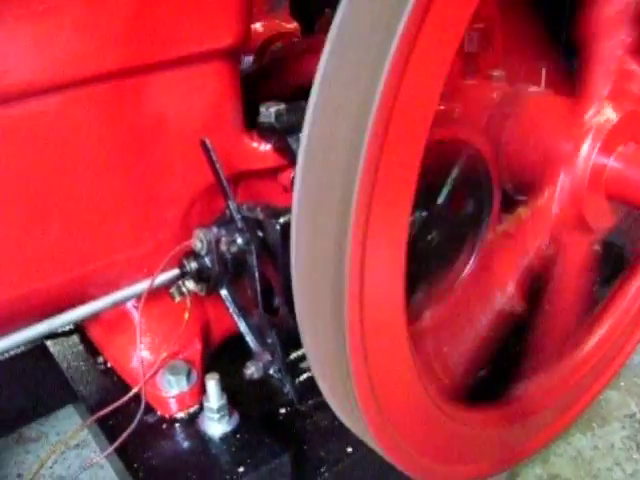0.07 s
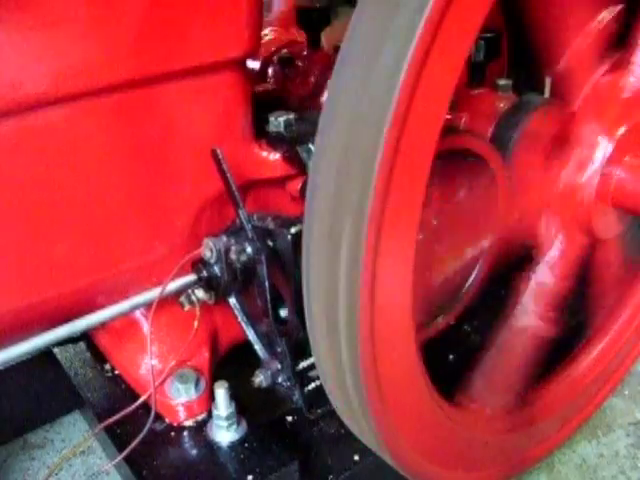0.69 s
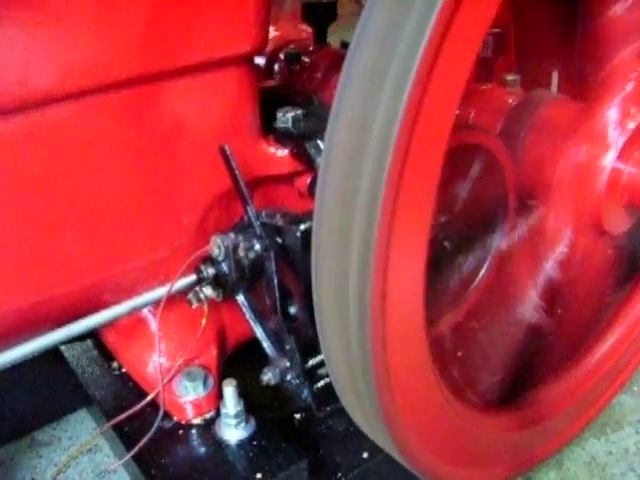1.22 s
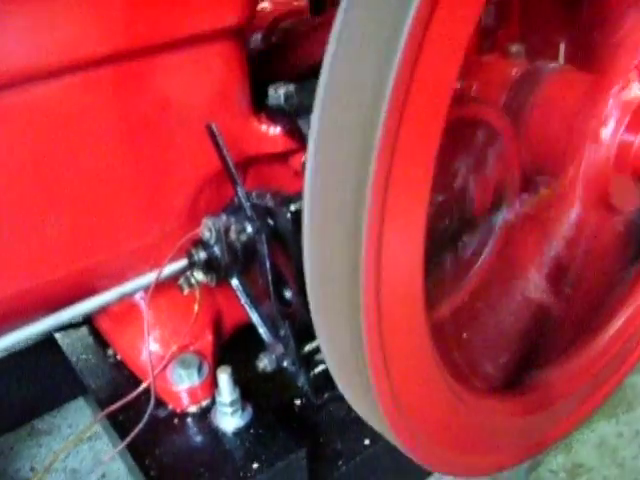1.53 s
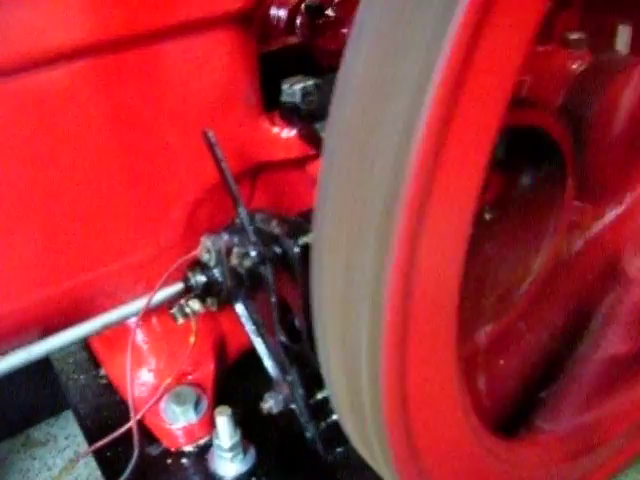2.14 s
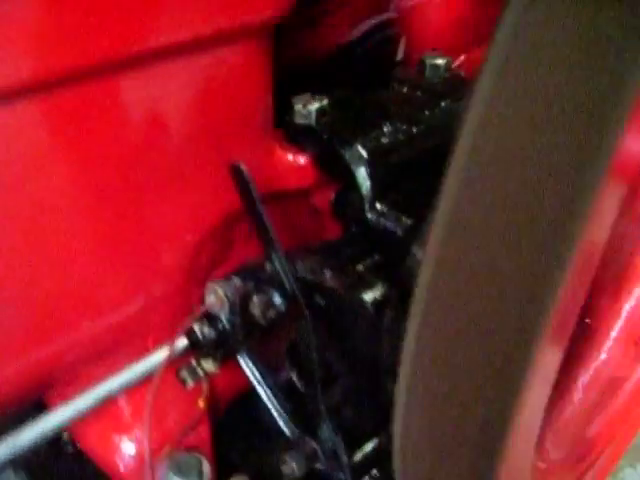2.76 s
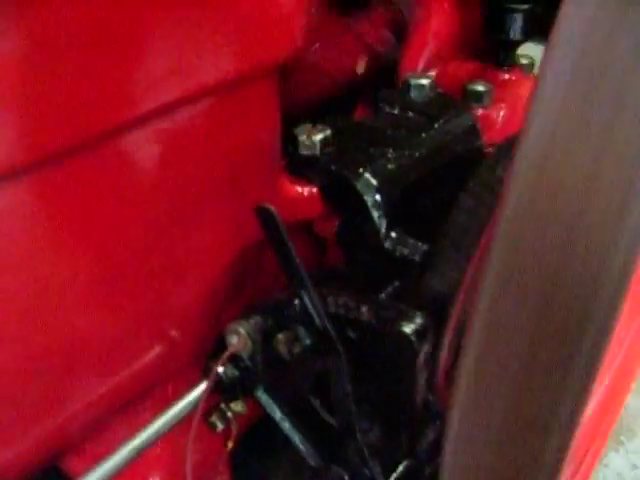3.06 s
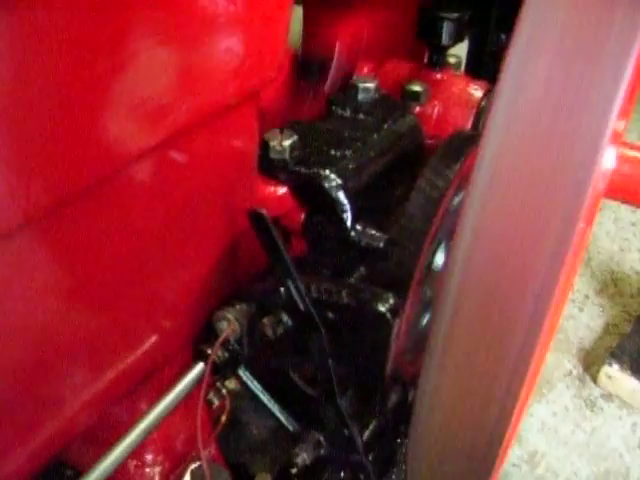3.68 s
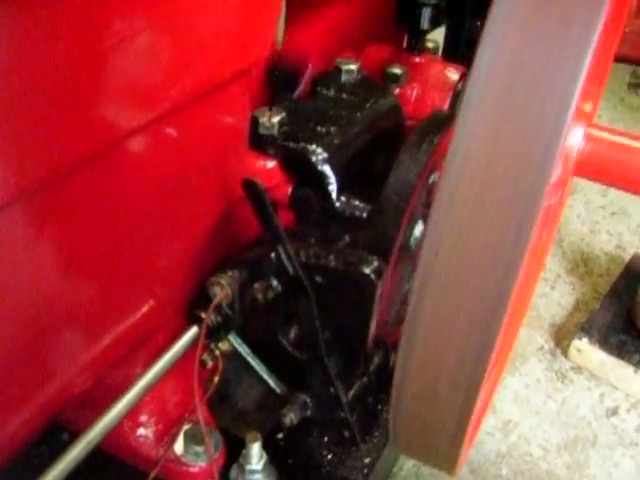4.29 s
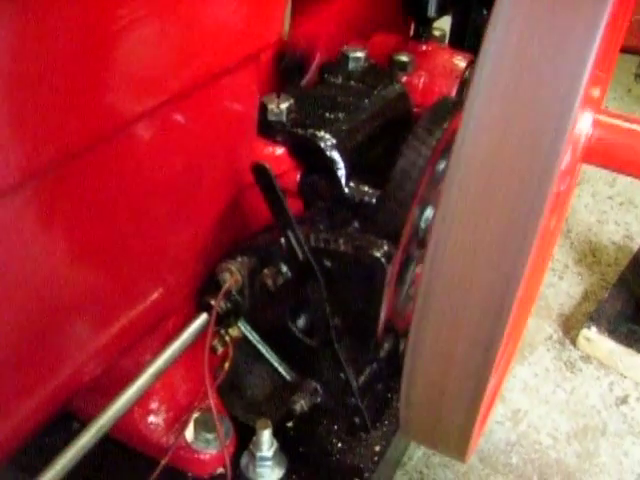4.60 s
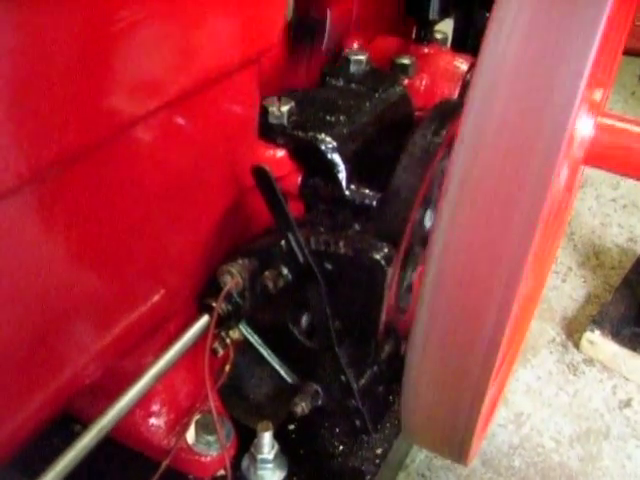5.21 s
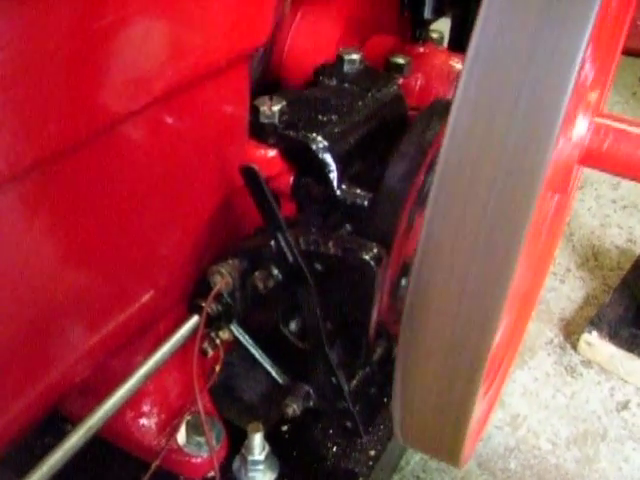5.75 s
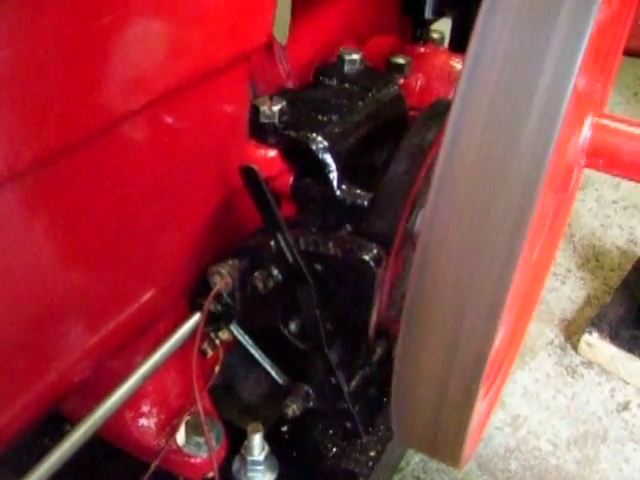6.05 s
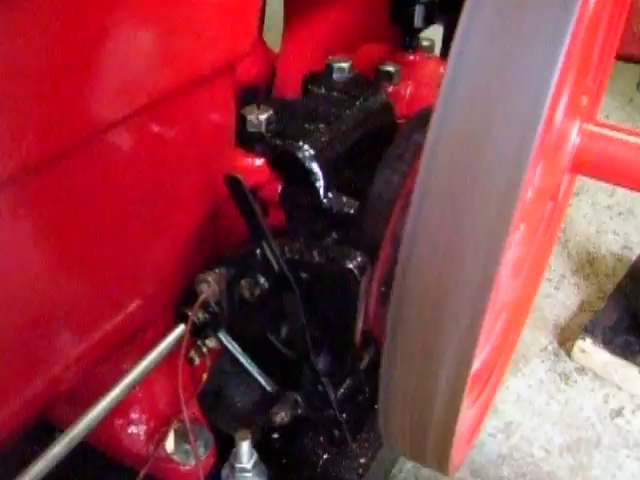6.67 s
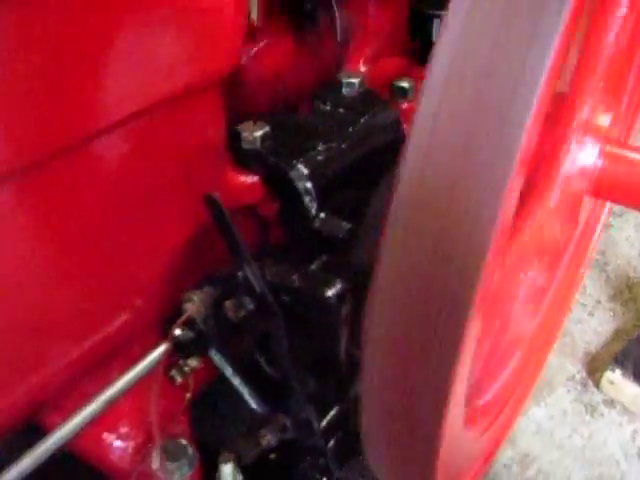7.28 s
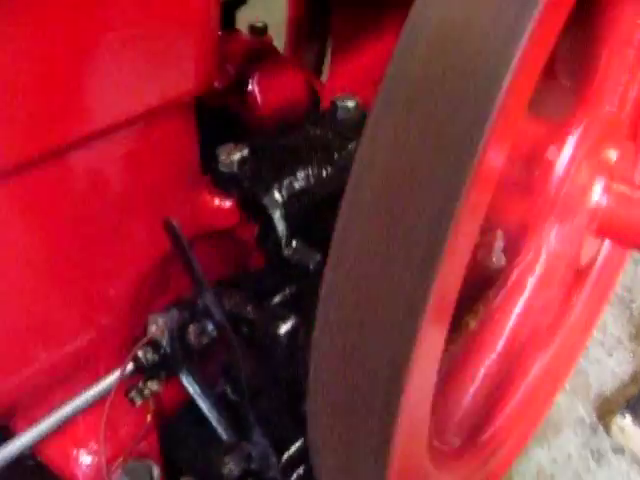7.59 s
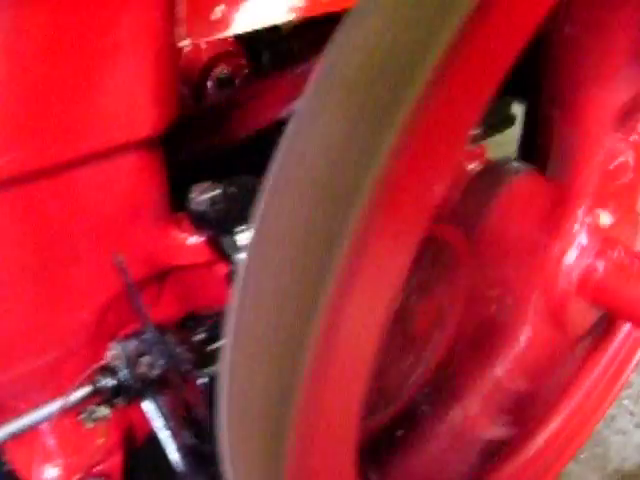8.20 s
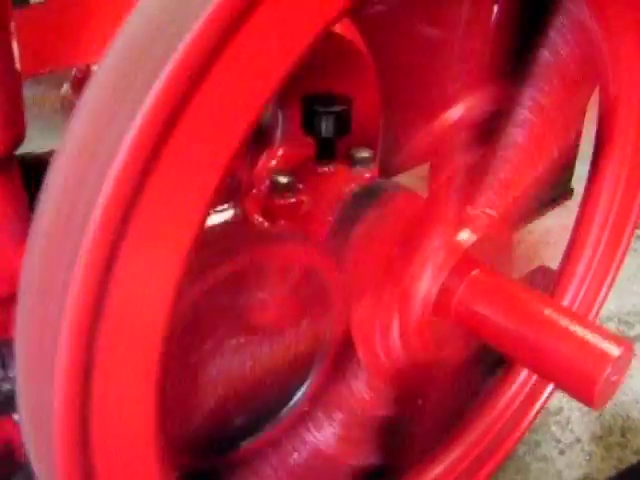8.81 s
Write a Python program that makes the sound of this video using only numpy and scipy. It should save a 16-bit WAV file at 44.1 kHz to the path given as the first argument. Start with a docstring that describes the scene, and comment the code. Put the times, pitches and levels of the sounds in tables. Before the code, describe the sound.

A stationary engine runs throughout, heard close up on a hard floor with a short room echo. Its open gears clatter and hum, with small high chirps of dry steel, while the latch, push rod and loose linkage knock about twice a second, each blow ringing hollowly in the castings. At about 0.6 seconds it snorts in air, the clatter hushes briefly, and at 1.1 seconds it fires with a clank and a short exhaust blast, then speeds up. From about 2 to 6 seconds it coasts, the knocks gradually spreading apart and the gear tones shifting. Around 6.3 seconds comes another thud and snort, a brief hush, and a second firing near 6.9 seconds. The rhythm quickens, lighter at first, with stronger knocks returning from about 8.3 seconds until the end at 9. The sound is narrow, with little treble and slight overload on peaks.

```python
"""On a hard floor, beside the flywheel of a hit-and-miss stationary engine.
Open timing gears clatter, hum and chirp as it coasts down, their wheels singing at critical speeds.
The governor latch, push rod and loose linkage knock on every cam turn and ring the castings.
Twice the engine snorts in a charge, hushes under compression, trips its igniter, fires and speeds up.
It all comes through a small narrow-band recorder that overloads on the peaks."""
import sys
import numpy as np
from scipy import signal
from scipy.fft import rfft, irfft
from scipy.io import wavfile
from scipy.ndimage import uniform_filter1d

SR = 44100
rng = np.random.default_rng(int(sys.argv[2]) if len(sys.argv) > 2 else 0)


def transcribe(u):
    """Save the signal u as a 16-bit wav file named by the first command-line argument.

    u: samples, shape (n,) or (channels, n), limited to [-1, 1]; the rate is SR.
    q: integer samples, one column per channel.
    """
    v = np.clip(np.atleast_2d(u).T, -1, 1)
    q = np.round(v * 32767).astype(np.int16)
    wavfile.write(sys.argv[1], SR, q)


N = 399105
T = np.arange(N) / SR

# The gears leap in speed at each firing, then coast. Each row: time in seconds, tooth rate in Hz.
TOOTH_RATE = [(0, 277.3), (.4, 263.2), (1.08, 231.2), (1.26, 300.6), (1.55, 286.3), (2, 279), (2.5, 263.8),
              (3.3, 239.7), (4.5, 217), (5.5, 190), (6.8, 161), (7, 299.7), (7.6, 284), (8.25, 261.3),
              (9.05, 234)]
# Gear fader, ahead of cam load and compression. Each row: time in seconds, level in dB.
GEAR_LEVEL = [(0, -9.5), (.25, -12), (.45, -15.5), (1.2, -12.5), (1.65, -13), (2.1, -9.5), (2.25, -15),
              (2.6, -13), (3.05, -10.5), (3.55, -14.5), (3.85, -19.5), (4.6, -15.5), (5.17, -10),
              (5.45, -20), (5.85, -11), (6.35, -15), (7.05, -24.5), (7.6, -20), (8.2, -18), (8.68, -12.5),
              (8.92, -21)]
# Hardness of the tooth contact. Each row: time in seconds, treble lift in dB.
TOOTH_HARDNESS = [(0, -3.5), (.95, -4), (1.3, 0.5), (2.2, -2), (3.1, -3), (4, -1), (5.2, -2), (6.2, -4),
                  (6.7, -1.5), (7, -2), (7.8, -1), (8.4, -2.5), (9.05, 3)]
# Load on the teeth around the cam. Each row: share of the turn, level in dB, treble lift in dB.
CAM_LOAD = [(0, -1, 3), (.1, -0.5, 0), (.17, 0.5, -0.5), (.25, -1.5, -3), (.31, 0, 1.5), (0.409, -2, -6),
            (.5, -0.5, 0.5), (.6, 1.5, 2), (0.699, .5, -0.5), (.88, 1, 2.5), (.96, -1, -4)]
# Compression presses the teeth together. Each row: start in seconds, length in seconds, duck in dB.
COMPRESSIONS = [(0.702, 0.296, -13), (6.412, 0.28, -15)]
# Tone of the frame under the teeth. Each row: frequency in Hz, relative level in dB.
FRAME_EQ = [(40, -35), (100, -21.5), (170, -10), (235, -14), (360, -5), (550, 1), (860, -1.5), (1040, 0),
            (1180, -5.5), (1400, -3), (2200, -7), (2600, -16), (3300, -15.5), (4000, -29)]
# Wheel resonances, each singing out near its critical speed. Each row: pitch in Hz, width in Hz,
# level in dB, critical tooth rate in Hz, spread around that rate in Hz, lift there in dB.
WHEEL_MODES = [(282.7, 19.6, -18, 185, 13, 4.5), (763.6, 10, -19, 254, 8, 11), (845, 110, -24, 160, 11, 9),
               (1440, 7.9, -25.5, 236, 8.3, 7.5)]
# How the wheels carry to a listener moving along the engine. Each row: time in seconds, gain in dB.
WHEEL_CARRY = [(0, 1), (1.3, 1.5), (1.9, 3.5), (2.6, 0.5), (3.4, 2), (6, 1), (6.95, -2), (7.9, -0.5),
               (9.05, 2.5)]
# Dry spots that chirp. Each row: share of the cam turn, level in dB against the gear fader.
DRY_SPOTS = [(.012, -8.5), (0.141, -15.5), (.312, -10.5), (.48, -13.5), (0.526, -12), (.59, -13),
             (.65, -15), (.745, -9.5), (.855, -9.5), (0.901, -15.5)]
# Hollow ring of the castings. Each row: pitch in Hz, 60 dB decay in seconds, relative level in dB.
CASTING_MODES = [(388, .11, -5), (432, .09, -4), (500, .11, -1), (535, .09, -2), (635, .07, -2),
                 (765, .12, -4), (838, .1, 0), (1017, .07, -8), (1448, .12, -10), (1700, .07, -12),
                 (1865, .06, -13), (2320, .06, -15)]
# Crack of steel on steel. Each row: frequency in Hz, relative level in dB.
CRACK_EQ = [(50, -54), (200, -19.5), (450, 8.5), (850, 10.5), (1200, 0.5), (2000, -3), (3300, -10.5),
            (4200, -31)]
# Cam turns of two revolutions, each opened by the governor latch. Each row: start in seconds,
# latch level in dB, latch brightness, level of this turn's slack knocks in dB.
CAM_TURNS = [(.424, 1, -9.5, -20), (1.127, 1, -9, -9), (1.609, 4, 3, -13), (2.079, 5.5, -12.5, -1),
             (2.573, 2, -5, -4), (3.088, 3.5, -5, 1), (3.635, 2, 0, -9), (4.207, -9, -4, -2),
             (4.816, -3, -7, -3), (5.465, -3, 4.5, -8.5), (6.164, 0.5, -4, -20.5), (6.857, 2, -24, -22.5),
             (7.325, -14, 1.5, -14.5), (7.797, -8.5, 3, -16), (8.293, -3.5, -8.5, -.5),
             (8.809, -6.5, -5.5, 2.5)]
# The push rod drops back after the latch. Each row: start in seconds, level in dB, brightness.
ROD_DROPS = [(.516, -4, -5), (1.667, 2, -15), (2.143, 4, -13), (2.64, 4, -12.5), (3.162, 4.5, -10.5),
             (3.715, 3, -14.5), (4.292, 1.5, -25), (4.902, 4.5, -17), (5.56, 0, -34), (6.269, -4, 1),
             (6.921, -14, 4), (7.387, -12.5, -7), (7.865, -8, -14.5), (8.361, 1.5, -17.5)]
# Slack in the linkage. Each row: share of the turn, level in dB against the turn's slack level,
# brightness, chatter decay in seconds.
SLACK_KNOCKS = [(.36, -11, -17, .008), (.631, 0, -6.5, .0055), (.86, -7, -11, 0.0099)]
# Igniter and valve knocks around the firings, and stray clanks. Each row: start in seconds,
# level in dB, brightness, chatter decay in seconds.
SINGLE_KNOCKS = [(.097, 0.5, -2.5, 0.007), (.123, 2, -5.5, 0.0077), (.275, 0, -14, 0.0055),
                 (.546, 3, -3, .008), (.792, -16, -19, .008), (.999, 3, -13, .0092),
                 (1.087, 0, -10, 0.0053), (1.749, -6.5, -1, 0.011), (5.149, 0, -7, 0.007),
                 (5.823, 1.5, -10, 0.0056), (5.963, -3, -22, 0.0085), (6.339, 0, 2, 0.0044),
                 (6.428, 3.5, -7, 0.0067), (6.563, -32, -16, 0.0077), (6.683, -24, -1, 0.0068),
                 (6.714, -1, -18.5, 0.0054), (6.792, -8.5, -20, 0.0078)]
# Intake snorts. Each row: start in seconds, length in seconds, level in dB.
INTAKE_SNORTS = [(.607, 0.11, -7.5), (.72, 0.041, -57), (6.34, 0.051, -6), (6.398, 0.07, -20.5)]
# Tone of the intake valve. Each row: frequency in Hz, relative level in dB.
INTAKE_EQ = [(60, -42), (160, 10), (400, 3.5), (900, 4.5), (1300, -2), (2100, -5.5), (2480, 8),
             (2750, -2.5), (3200, 2.5), (4200, -18.5)]
# Combustion thuds and exhaust blasts. Each row: start in seconds, length in seconds, level in dB.
EXHAUST_BLASTS = [(.548, 0.051, -9.5), (1.087, 0.0027, 1), (1.15, 0.077, -5), (6.285, 0.027, -5.5),
                  (6.857, 0.045, -5.5)]
# Tone of the exhaust. Each row: frequency in Hz, relative level in dB.
EXHAUST_EQ = [(40, -31.5), (130, -5.5), (300, 3), (800, 1), (1500, -7.5), (3000, -7.5), (4200, -3)]


def undb(db):
    """Decibels to gain."""
    return 10 ** (np.asarray(db) / 20)


def unit(x):
    """Scale to rms 1."""
    return x / np.sqrt(np.mean(x ** 2))


def curve(table):
    """Straight-line automation through (seconds, value) points."""
    return np.interp(T, *np.transpose(table))


def wander(rate_hz):
    """A smooth random drift, rms 1."""
    size = int(SR / rate_hz)
    return unit(uniform_filter1d(uniform_filter1d(rng.standard_normal(N), size), size))


def convolve(x, response):
    """Play a signal through an impulse response scaled to unit energy."""
    return signal.fftconvolve(x, response / np.linalg.norm(response))[:N]


def colour(x, points, size=2048):
    """Minimum-phase EQ through (Hz, dB) points, rolled off above 5 kHz."""
    hz, db = np.transpose(points)
    bins_hz = np.maximum(np.fft.rfftfreq(size, 1 / SR), 1)
    gain = undb(np.interp(np.log(bins_hz), np.log(hz), db)) / (1 + (bins_hz / 5000) ** 8)
    cepstrum = irfft(np.log(gain))
    cepstrum[1:size // 2] *= 2
    cepstrum[size // 2 + 1:] = 0
    return convolve(x, irfft(np.exp(rfft(cepstrum))))


def treble_shelf(x, corner_hz, lift_db):
    """Lift or dull the top and keep the body."""
    body = signal.sosfiltfilt(signal.butter(2, corner_hz, fs=SR, output="sos"), x)
    return body + undb(lift_db) * (x - body)


def ring(x, modes):
    """Excite decaying (Hz, t60 seconds, dB) modes of alternating polarity."""
    t = T[:SR // 2]
    response = sum((-1) ** k * undb(db - 60 * t / t60) * np.cos(2 * np.pi * hz * t)
                   for k, (hz, t60, db) in enumerate(modes))
    return convolve(x, response)


def pulses(rate_hz, jitter, scatter_db, decay_s, count=9000):
    """Envelope of uneven contacts, each dying away quickly; rms 1."""
    timing, strength = rng.standard_normal((count, 2)).T
    at = (np.cumsum(np.exp(jitter * timing)) / rate_hz * SR).astype(int)
    energy = np.bincount(at[at < N], undb(scatter_db * strength[at < N]) ** 2, N)
    power = signal.lfilter([1], [1, -np.exp(-2 / (decay_s * SR))], energy)
    return unit(np.sqrt(power))


def turn_edges(first_turn_s=0.71, last_turn_s=0.49):
    """Times at which the cam passes its latch, with one more added at each end."""
    latches = [turn[0] for turn in CAM_TURNS]
    return np.array([latches[0] - first_turn_s, *latches, latches[-1] + last_turn_s])


def every_turn(share):
    """Times at which the cam reaches a share of its turn."""
    edges = turn_edges()
    return edges[:-1] + share * np.diff(edges)


def cam_load():
    """Level and treble lift in dB that go round with the cam."""
    edges = turn_edges()
    turns = np.interp(T, edges, np.arange(len(edges)))
    share, *columns = np.transpose(CAM_LOAD)
    return [np.interp(turns, share, column, period=1) for column in columns]


def rattle_db(close_s=.04, release_s=0.11):
    """The gear fader: rattling freely while coasting, ducked under compression."""
    level_db = curve(GEAR_LEVEL)
    for start_s, length_s, duck_db in COMPRESSIONS:
        corners_s = np.cumsum([start_s, close_s, length_s - close_s, release_s])
        level_db += duck_db * np.interp(T, corners_s, [0, 1, 1, 0])
    return level_db


def room(x, t60_s=0.23, tail_db=-9, predelay_s=.006):
    """The hard floor and walls add a short tail."""
    t = T[:SR // 2]
    tail = rng.standard_normal(len(t)) * undb(-60 * t / t60_s) * (t > predelay_s)
    return x + undb(tail_db) * convolve(x, tail)


def chirps(rub_db=-21, scatter_db=3.5, swell_sigma_s=0.0098, band_hz=(2930, 3050)):
    """Dry steel rubs in one high resonance and swells into a chirp at each dry spot."""
    peaks = np.zeros(N)
    for share, db in DRY_SPOTS:
        at = (every_turn(share) * SR).astype(int)
        strength = undb(db + scatter_db * rng.standard_normal(len(at)))
        heard = (at >= 0) & (at < N)
        peaks[at[heard]] += strength[heard]
    swells = signal.fftconvolve(peaks, signal.windows.gaussian(SR // 5, swell_sigma_s * SR), "same")
    resonance = signal.butter(2, band_hz, "band", fs=SR, output="sos")
    squeak = unit(signal.sosfilt(resonance, rng.standard_normal(N)))
    return np.hypot(swells, undb(rub_db)) * undb(rattle_db()) * squeak


def gear_hum(db=-10.5, width_hz=36, throb_depth=0.41, throb_rad=0.29, roughness=0.36, teeth=68):
    """The tooth tone swells near the lowest wheel resonance and throbs once a revolution."""
    tooth_hz = curve(TOOTH_RATE)
    phase = 2 * np.pi * np.cumsum(tooth_hz) / SR
    resonance = 1 / (1 + ((tooth_hz - WHEEL_MODES[0][0]) / (width_hz / 2)) ** 4)
    tone = (1 + roughness * wander(35)) * np.sin(phase) + roughness * wander(42) * np.cos(phase)
    throb = 1 + throb_depth * np.cos(phase / teeth + throb_rad)
    return undb(db) * resonance * throb * np.sqrt(2) * tone


def gears(clatter_db=-3.5, castings_db=-8, unsteady_db=1.54):
    """Teeth strike with loose backlash, shake the frame and keep castings and wheels ringing."""
    load_db, bite_db = cam_load()
    tooth_hz, carry_db = curve(TOOTH_RATE), curve(WHEEL_CARRY)
    contact = pulses(rate_hz=210, jitter=.3, scatter_db=2.0, decay_s=.004)
    on_frame, on_castings, on_wheels = contact * rng.standard_normal((3, N))
    clatter = treble_shelf(colour(on_frame, FRAME_EQ), 1150, curve(TOOTH_HARDNESS) + bite_db)
    sound = undb(clatter_db) * unit(clatter)
    sound += undb(castings_db) * unit(ring(on_castings, CASTING_MODES))
    for hz, width_hz, db, critical_hz, spread_hz, lift_db in WHEEL_MODES:
        nearness = np.exp(-((tooth_hz - critical_hz) / spread_hz) ** 2 / 2)
        t60_s = np.log(1000) / (np.pi * width_hz)
        sound += undb(carry_db + db + lift_db * nearness) * unit(ring(on_wheels, [(hz, t60_s, 0)]))
    sound += undb(carry_db) * gear_hum()
    return sound * undb(rattle_db() + load_db + unsteady_db * wander(33))


def knock_cues(latch_decay_s=0.0089, rod_decay_s=0.0088):
    """Cue list of single knocks, latch, push rod and slack, laid out like SINGLE_KNOCKS."""
    cues = list(SINGLE_KNOCKS)
    cues += [(start_s, db, brightness, latch_decay_s) for start_s, db, brightness, _ in CAM_TURNS]
    cues += [(start_s, db, brightness, rod_decay_s) for start_s, db, brightness in ROD_DROPS]
    for share, db, brightness, decay_s in SLACK_KNOCKS:
        for start_s, (*_, slack_db) in zip(every_turn(share)[1:], CAM_TURNS):
            cues.append((start_s, slack_db + db, brightness, decay_s))
    return cues


def knocks(trim_db=-10.0, ring_db=-1, rise_s=0.0012, neutral_brightness=-12, db_per_step=0.91):
    """Each blow chatters for a moment: a steel crack, then the hollow ring of the castings."""
    out, t = np.zeros(2 * N), T[:SR // 10]
    for start_s, db, brightness, decay_s in knock_cues():
        chatter = (1 - np.exp(-t / rise_s)) * np.exp(-t / decay_s) * rng.standard_normal(len(t))
        lift_db = db_per_step * (brightness - neutral_brightness)
        crack = colour(treble_shelf(chatter, 1200, lift_db), CRACK_EQ)
        blow = undb(ring_db) * ring(chatter, CASTING_MODES)
        blow[:len(crack)] += crack
        attack_rms = np.std(blow[:SR // 60])
        start = int(start_s * SR)
        out[start:start + len(blow)] += blow * undb(db + trim_db) / attack_rms
    return out[:N]


def gas(bursts, eq, rise_s, fall_s):
    """Turbulent gas rushes while a valve stands open."""
    flow = np.zeros(N)
    for start_s, length_s, db in bursts:
        opening = np.clip((T - start_s) / rise_s, 0, 1)
        closing = np.exp(-np.maximum(T - start_s - length_s, 0) / fall_s)
        flow += undb(db) * opening * closing
    return colour(flow * rng.standard_normal(N), eq)


def intake():
    """The charge snorts in through a fluttering valve."""
    flutter = pulses(rate_hz=150, jitter=0.11, scatter_db=6.0, decay_s=0.0077)
    return gas(INTAKE_SNORTS, INTAKE_EQ, rise_s=0.0031, fall_s=0.0087) * flutter


def exhaust():
    """Combustion thuds and spent gas leaves in short blasts."""
    return gas(EXHAUST_BLASTS, EXHAUST_EQ, rise_s=0.0049, fall_s=0.0033)


def scene():
    """Snorts, firings, gears, chirps and knocks in one room, in mono."""
    return room(intake() + exhaust() + gears() + chirps() + knocks())[None]


def record(dry, low_cut_hz=90, knee=0.45, limit=0.64, flip=1.684, ceiling=0.68, recorder_sr=8000):
    """A speech-band recorder: gain control squeezes loud moments, and overloads flip back with a snap."""
    thin = signal.sosfilt(signal.butter(2, low_cut_hz, "high", fs=SR, output="sos"), dry)
    memory = np.exp(-1 / (0.064 * SR))  # 64 ms level detector
    power = signal.lfilter([1 - memory], [1, -memory], thin ** 2)
    squeezed = thin / (1 + (power / knee ** 2) ** 2) ** (1 / 8)
    narrow = signal.resample_poly(squeezed, recorder_sr, SR, axis=1)
    excess = np.maximum(np.abs(narrow) - limit, 0)
    folded = np.clip(narrow, -limit, limit) - np.sign(narrow) * np.minimum(flip * excess, 2 * limit)
    smooth = signal.resample_poly(folded, SR, recorder_sr, axis=1, window=("kaiser", 8))[:, :N]
    smooth = signal.sosfiltfilt(signal.butter(14, 4350, fs=SR, output="sos"), smooth)
    ticking = np.clip(smooth, -ceiling, ceiling)  # overshoots clip into tiny ticks
    return signal.sosfilt(signal.ellip(8, .2, 70, 15800, fs=SR, output="sos"), ticking)


dry = scene()
out = record(dry)
transcribe(out)
```